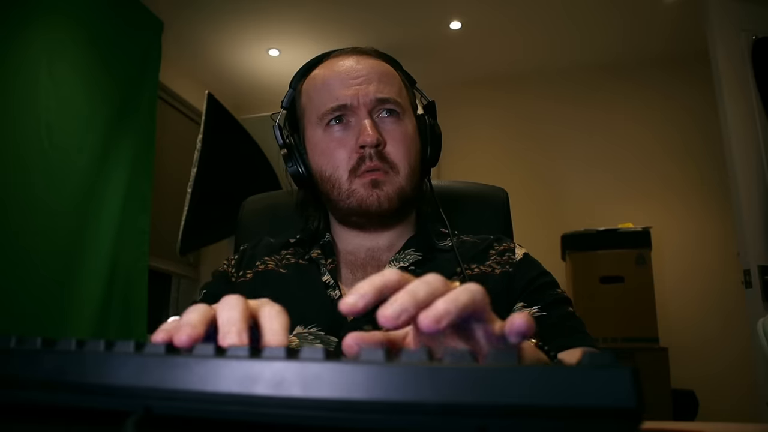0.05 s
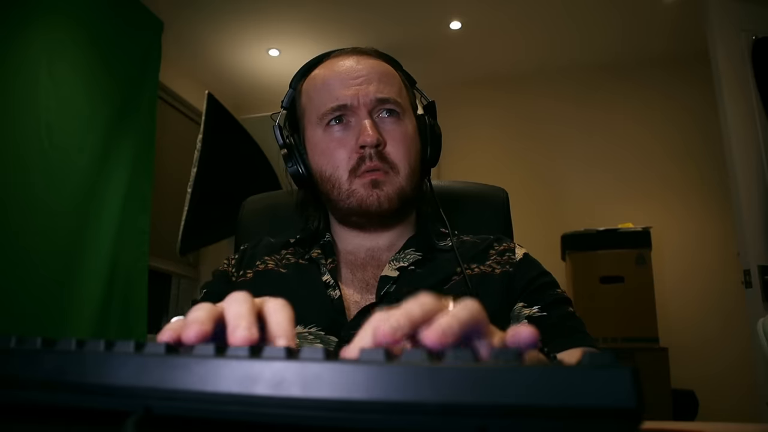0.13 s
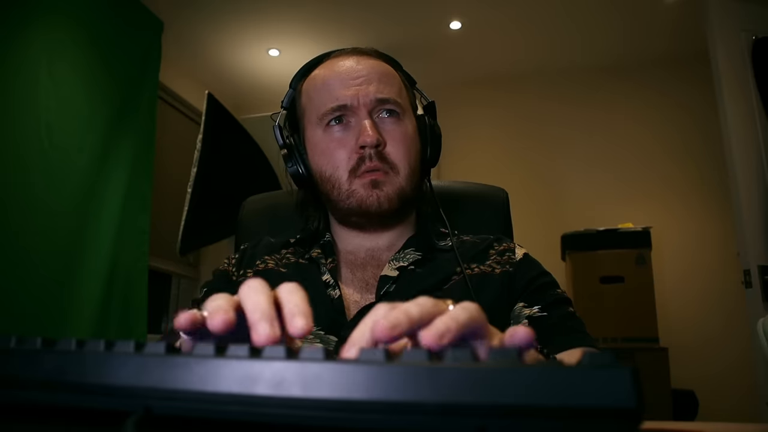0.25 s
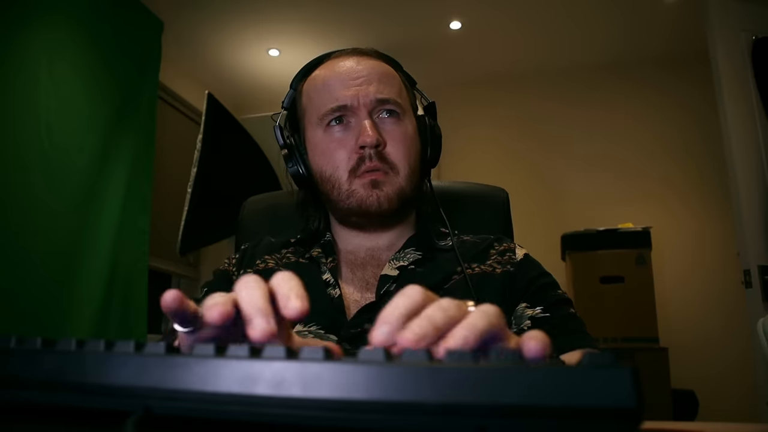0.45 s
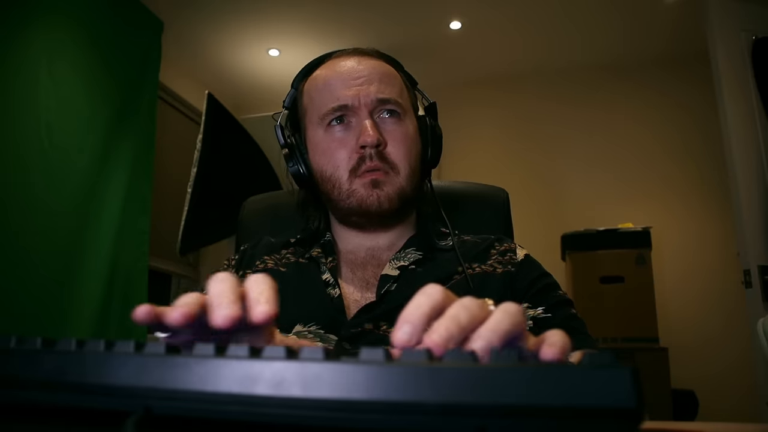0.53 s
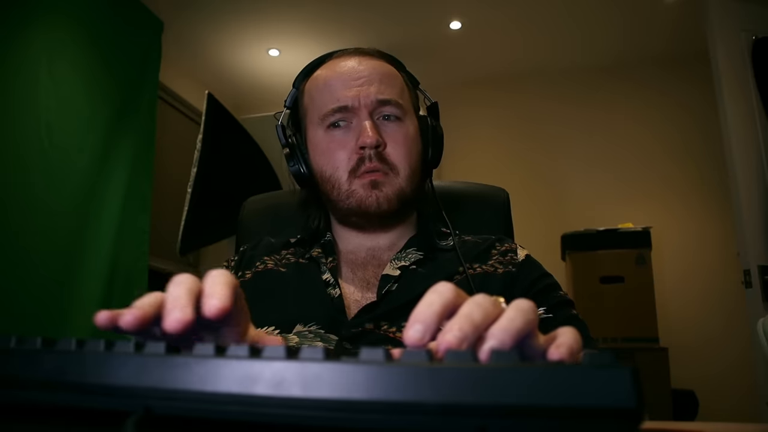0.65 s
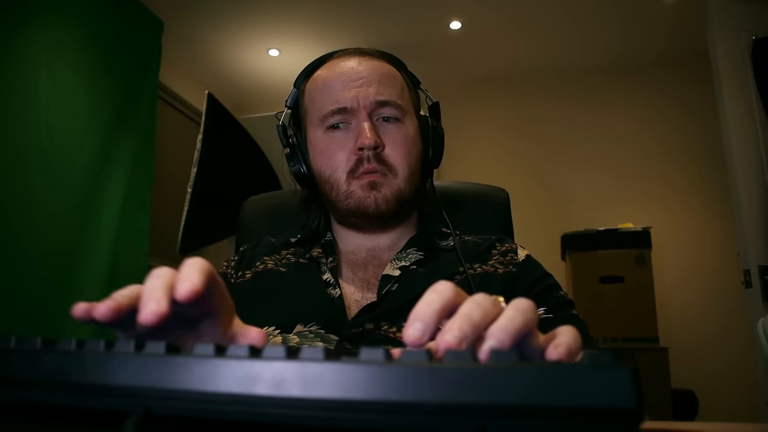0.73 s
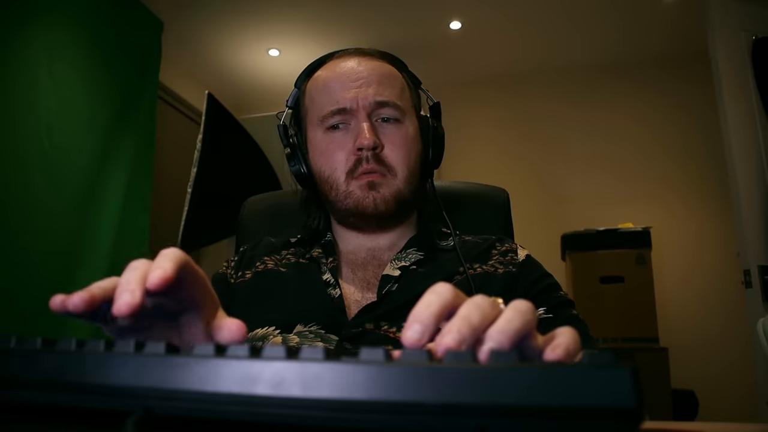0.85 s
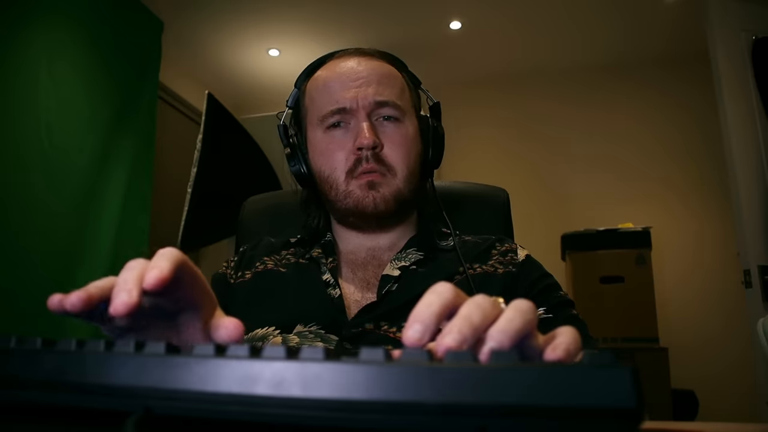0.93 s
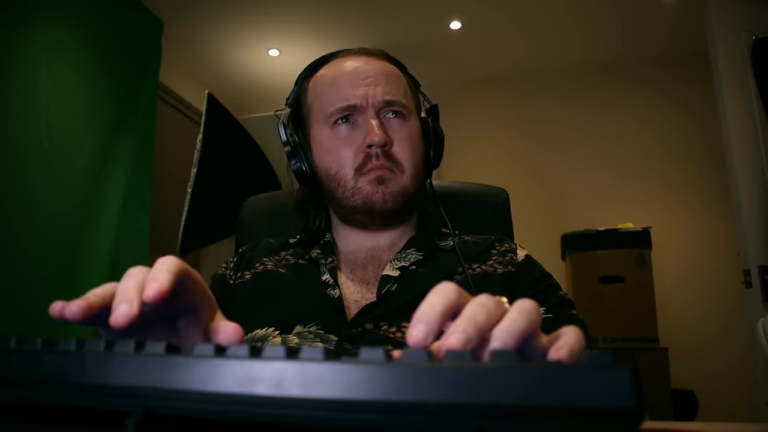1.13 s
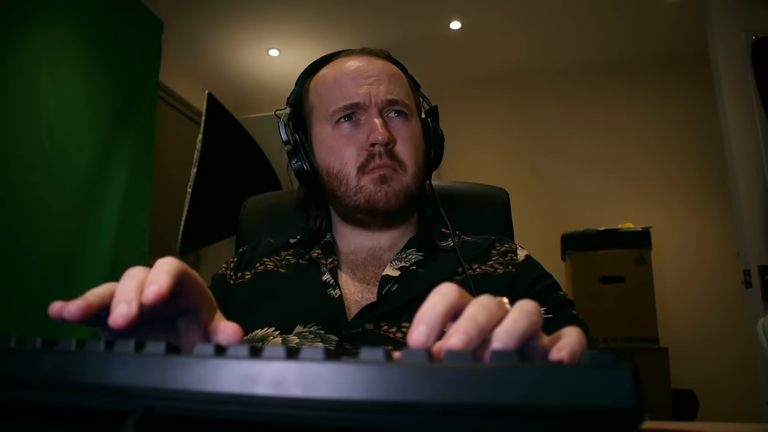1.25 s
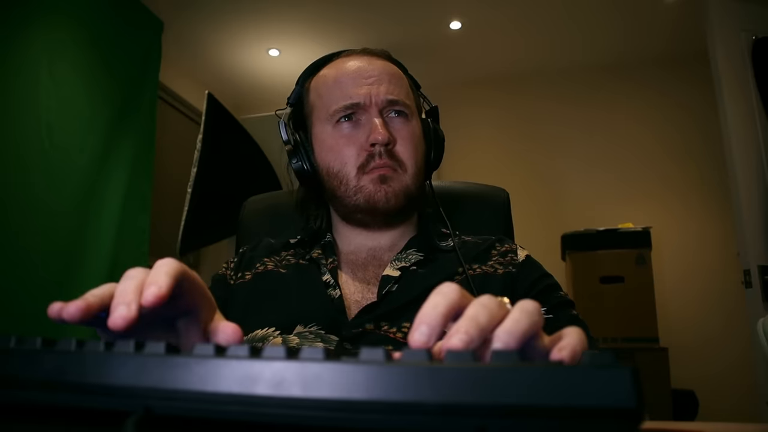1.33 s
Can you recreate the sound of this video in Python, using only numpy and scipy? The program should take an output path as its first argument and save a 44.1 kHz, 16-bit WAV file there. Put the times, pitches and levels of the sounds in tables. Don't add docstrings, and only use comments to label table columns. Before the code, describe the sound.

Two computer keyboard keys clack in quick succession, thumping the desk, over a faint low hum

```python
import sys
import numpy as np
from scipy import signal
from scipy.fft import rfft, irfft
from scipy.io import wavfile

SR = 44100
rng = np.random.default_rng(int(sys.argv[2]) if len(sys.argv) > 2 else 0)


def how_loud(loudness_db):
    steps = np.asarray(loudness_db, float) / 20
    return 10 ** steps


def digitize_waveform(pressure):
    field = np.atleast_2d(pressure).T
    bounded = np.clip(field, -1, 1)
    quanta = np.round(bounded * 32767).astype(np.int16)
    wavfile.write(sys.argv[1], SR, quanta)


N = 61739


def add(out, start_s, x):
    i = int(start_s * SR)
    out[i:i + len(x)] += x[:N - i]


def ring(drive, hz, t60_s):
    radius = how_loud(-60 / (t60_s * SR))
    w = 2 * np.pi * hz / SR
    return signal.lfilter([0, np.sin(w)], [1, -2 * radius * np.cos(w), radius ** 2], drive + 1e-18)


# pitch_hz, level_db, t60_s
CASE_MODES = [(670, -20.5, 0.012), (1000, -4.5, .021), (1320, -0.5, 0.023), (2200, -2, .014)]
# pitch_hz, level_db, t60_s
SPRING_MODES = [(5800, -0.5, .005), (7450, -5, .005), (8790, -0.5, 0.0065), (10600, -13.5, 0.0048),
                (11700, -17, 0.0062), (14000, -20, 0.0021)]


def key_modes(cap_hz, case_db, spring_db):
    cap_t60_s = 0.011
    cap = [(cap_hz, 0, cap_t60_s), (cap_hz * 1.45, -5, cap_t60_s * 0.83)]
    case = [(hz, db + case_db, t60_s) for hz, db, t60_s in CASE_MODES]
    spring = [(hz, db + spring_db, t60_s) for hz, db, t60_s in SPRING_MODES]
    return cap + case + spring


# start_s, peak_db, cap_hz, case_rel_db, spring_rel_db
KEY_CONTACTS = [(.0433, -45, 3330, -43, -13.5), (.2000, -35, 3700, -32, -6.5),
                (.2059, -10, 3250, -18.5, -13), (0.2067, -20.5, 4400, -17, -20),
                (.3119, -32, 2880, -8.5, 0.5), (.3123, -33, 4530, -14, -4.5), (0.3561, -19, 2900, -28, -8),
                (.3676, -12, 2970, -21, -8.5), (.3803, -33.5, 2550, -27.5, -16),
                (.4547, -20.5, 2930, -8, -6.5), (.4605, -30.5, 2900, -9, -25)]


def keys():
    touch_s, roughness = 0.001, 0.3
    out = np.zeros(N)
    t = np.arange(3000) / SR
    fade = np.exp(-t / touch_s)
    fade /= np.sqrt(np.sum(fade ** 2))
    grits = rng.standard_normal((len(KEY_CONTACTS), len(t)))
    for (start_s, peak_db, *colour), grit in zip(KEY_CONTACTS, grits):
        touch = (t == 0) + roughness * grit * fade
        stroke = np.zeros(len(t))
        for k, (hz, db, t60_s) in enumerate(key_modes(*colour)):
            stroke += (-1) ** k * how_loud(db) * ring(touch, hz, t60_s)
        add(out, start_s, how_loud(peak_db - 3.5) * stroke)
    return out


def swings(rows):
    sharpness = 4.5
    out = np.zeros(N)
    t = np.arange(SR // 4) / SR
    for start_s, peak_db, hz, rise_s in rows:
        swell = (t / rise_s * np.exp(1 - t / rise_s)) ** sharpness
        add(out, start_s, how_loud(peak_db) * swell * np.sin(2 * np.pi * hz * t))
    return out


# start_s,
# peak_db, pitch_hz, rise_s
STEM_BRUSHES = [
    (.1972, -37, 3250, .0015),
    (.1996, -22.5, 3670, 0.0015),
    (.2016, -33, 3200, 0.00095),
    (.2172, -25.5, 3930, 0.0011),
                (.4395, -42, 2900, .0014),
    (.4445, -41, 3100, .0011),
    (.4470, -45, 3300, .0012),
    (.4443, -54, 8900, .0010),
]


def brushes():
    return swings(STEM_BRUSHES)


# start_s, peak_db, pitch_hz, rise_s
DESK_THUMPS = [
    (0.2061, -15.5, 124.4, .015),
    (0.239, -23, 122.3, .014),
    (.2530, -28, 132.1, 0.015),
    (.3120, -34.5, 110.5, 0.015),
    (.3440, -33.5, 158.5, 0.0098),
    (0.3684, -22, 128.8, 0.018),
    (0.399, -32, 121, 0.023),
    (0.449, -29.5, 123.9, .024),
    (.5310, -43, 119, .018),
]
# start_s, pitch_hz, level_db, t60_s
DESK_MODES = [(.208, 62, -16.5, 0.16), (.2175, 193.3, -28, 0.25), (0.373, 77, -10.5, 0.056),
              (.372, 45.5, -35.5, 0.55), (0.382, 126, -23, 0.14), (0.401, 206, -33, .2),
              (0.454, 325, -44.5, 0.18), (0.224, 327.2, -52.5, .3), (0.346, 240.4, -45.5, 0.19),
              (.375, 322.7, -47, 0.19), (.49, 216.4, -51, .3), (0.387, 88, -57.5, 7.2),
              (0.386, 106, -65.5, 3.7)]
# start_s, pitch_hz, level_db, t60_s
STAND_SWAY = [
    (.3871, 135.5, -52, 7),
    (.385, 16.5, -46, 6),
    (.340, 11.5, -49, 6),
]


def desk():
    mode_rise_s = 0.01
    out = swings(DESK_THUMPS)
    t = np.arange(N) / SR
    rise = 1 - np.exp(-t / mode_rise_s)
    for start_s, hz, db, t60_s in [*DESK_MODES, *STAND_SWAY]:
        add(out, start_s, how_loud(db - 60 * t / t60_s) * rise * np.sin(2 * np.pi * hz * t))
    return out


# pitch_hz, t60_s
ROOM_T60 = [(600, .35), (1300, 0.23), (3500, .21), (12000, 0.29)]
# start_s, level_db, cap_hz, case_rel_db, spring_rel_db
STROKE_TAILS = [
    (0.0422, -76.5, 3720, -24, -16),
    (.2006, -49.5, 3750, -20, -22),
    (.2066, -29.5, 3060, -17.5, -18),
    (.2180, -41.5, 4055, -18, -21.5),
    (.3123, -47, 2760, -9.5, -10.5),
    (0.3565, -41, 3182, -24, -18),
    (0.3679, -35, 2710, -27.5, -12.5),
    (0.4552, -44.5, 2840, -4, -11.5),
]
# start_s, level_db, pitch_hz, t60_s
SINGING_PARTS = [
    (.3570, -56, 9200, 0.011),
    (.3700, -50, 9250, 0.012),
    (.4552, -58, 9000, 0.0095),
    (.2200, -40, 4300, 0.012),
    (.3720, -44, 2400, 0.017),
]


def room():
    early_db, early_t60_s, onset_s, far_damping = 3, 0.02, 0.0015, 0.34
    out = np.zeros(N)
    t = np.arange(SR // 3) / SR
    onset = np.clip(t / onset_s, 0, 1)
    early = how_loud(early_db - 60 * t / early_t60_s)
    sources = [(start_s, db, key_modes(*colour)) for start_s, db, *colour in STROKE_TAILS]
    sources += [(start_s, db, [(hz, 0, t60_s)]) for start_s, db, hz, t60_s in SINGING_PARTS]
    noises = rng.standard_normal((len(sources), len(t)))
    for (start_s, level_db, modes), noise in zip(sources, noises):
        for k, (hz, db, t60_s) in enumerate(modes):
            late = how_loud(-60 * t / np.interp(hz, *np.transpose(ROOM_T60)))
            echoes = ring(np.roll(noise, 997 * k), hz, t60_s * far_damping)
            add(out, start_s, how_loud(level_db + db - 12) * (late + early) * onset * echoes)
    return out


def coloured(points, level_db):
    hz, db = np.transpose(points)
    axis_hz = np.maximum(np.arange(N // 2 + 1) * SR / N, 1)
    shape_db = np.interp(np.log(axis_hz), np.log(hz), db, left=-90, right=-90)
    x = irfft(rfft(rng.standard_normal(N)) * how_loud(shape_db), N)
    return how_loud(level_db) * x / x.std()


# pitch_hz, peak_db
HUM_LINES = [(243, -72.5), (626, -74), (1240, -84)]
# pitch_hz, density_db
FAN_SPECTRUM = [(12, -7), (50, -11), (80, 1), (150, -2.5), (240, -5), (290, -15.5), (330, -6.5), (460, -24)]
# pitch_hz, density_db
HISS_SPECTRUM = [(420, 11), (700, 7.5), (1400, 3), (2000, -2.5), (3500, -2), (5500, -7), (15600, -8)]
# time_s, gain_db
BACKGROUND_GAIN = [(0, 0.5), (.2, -1.5), (.56, 3.5), (.59, -9.5), (.62, 2), (.65, -4), (.72, 0.5), (1.0, 0),
                   (1.4, -1.5)]


def background():
    t = np.arange(N) / SR
    waver = how_loud(-0.6 * np.sin(2 * np.pi * 3.9 * t))
    hum = np.zeros(N)
    for hz, db in [(120, -45), *HUM_LINES]:
        hum += how_loud(db) * np.sin(2 * np.pi * hz * t)
    fan = coloured(FAN_SPECTRUM, level_db=-59.5)
    hiss = coloured(HISS_SPECTRUM, level_db=-71.5)
    gain = how_loud(np.interp(t, *np.transpose(BACKGROUND_GAIN)))
    return gain * (waver * hum + fan + hiss)


def scene():
    key_band_hz = [486, 14000]
    band = signal.butter(2, key_band_hz, "band", fs=SR, output="sos")
    key_sound = signal.sosfilt(band, keys() + brushes() + room())
    return (key_sound + desk() + background())[None]


def roll_off(x):
    return signal.sosfilt(signal.butter(12, 15790, fs=SR, output="sos"), x)


def record(dry):
    top_cut = signal.cheby2(12, 60, 16600, fs=SR, output="sos")
    mix = signal.sosfilt(top_cut, dry)
    return roll_off(mix)


dry = scene()
out = record(dry)
digitize_waveform(out)
```